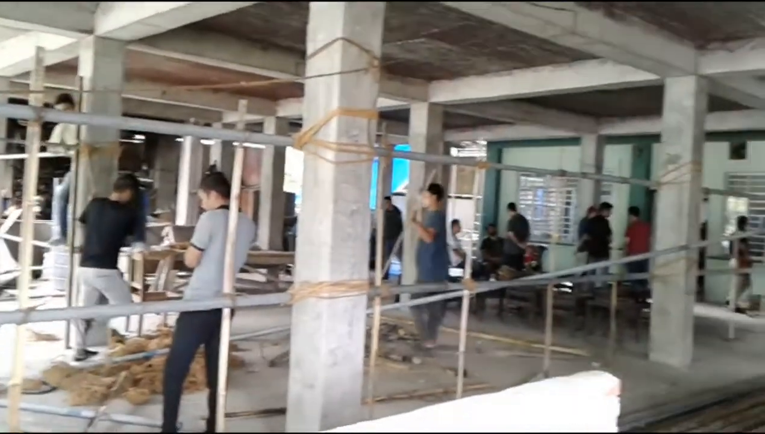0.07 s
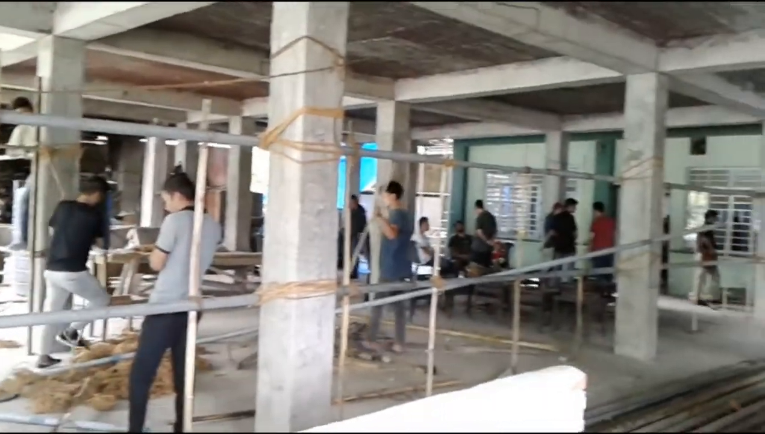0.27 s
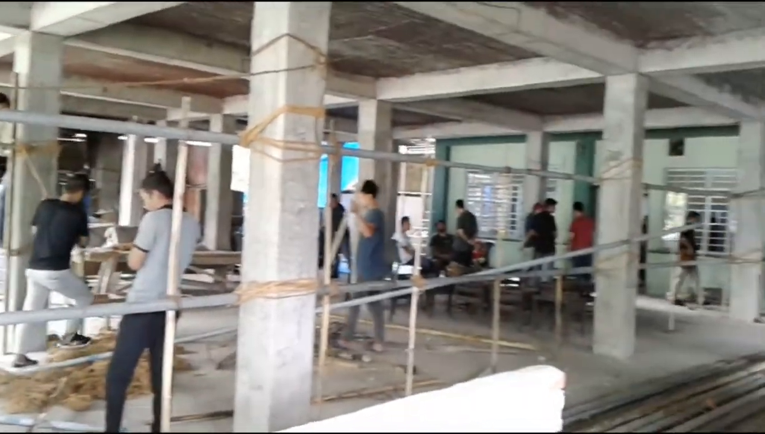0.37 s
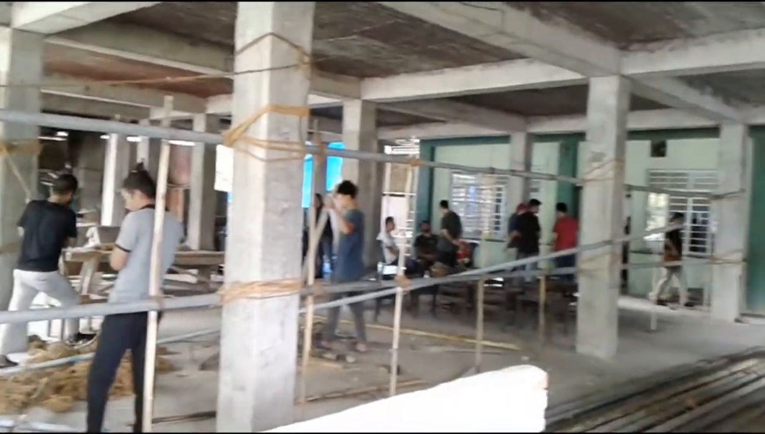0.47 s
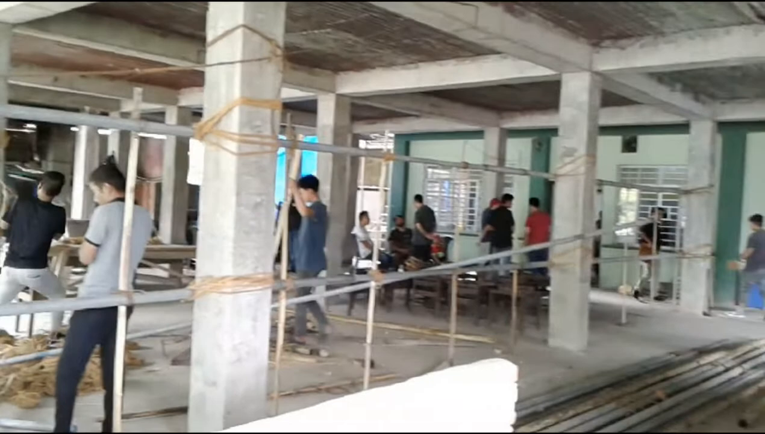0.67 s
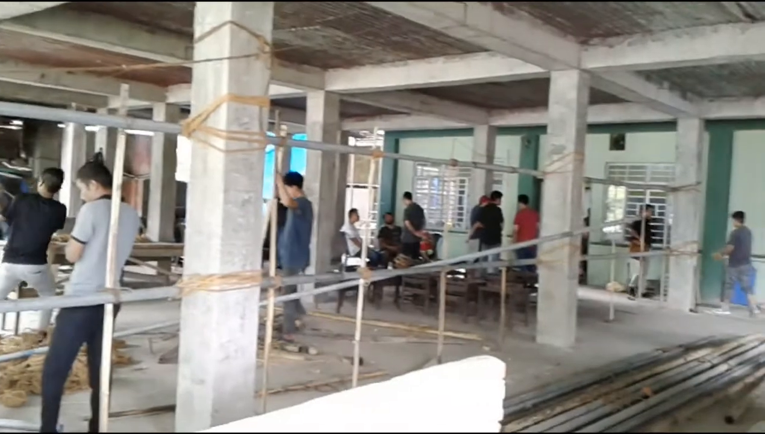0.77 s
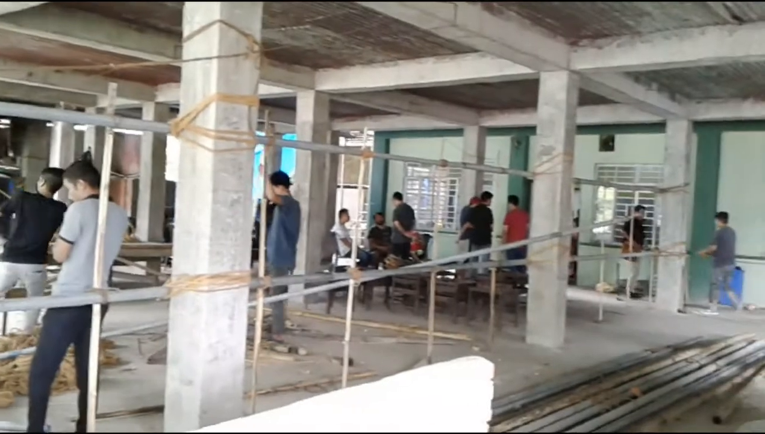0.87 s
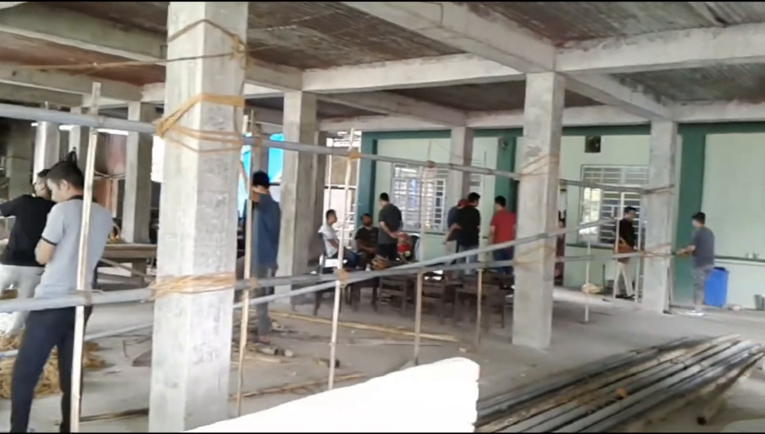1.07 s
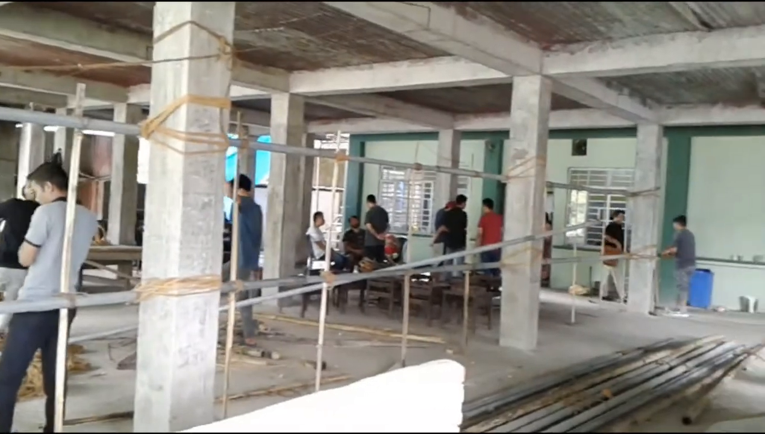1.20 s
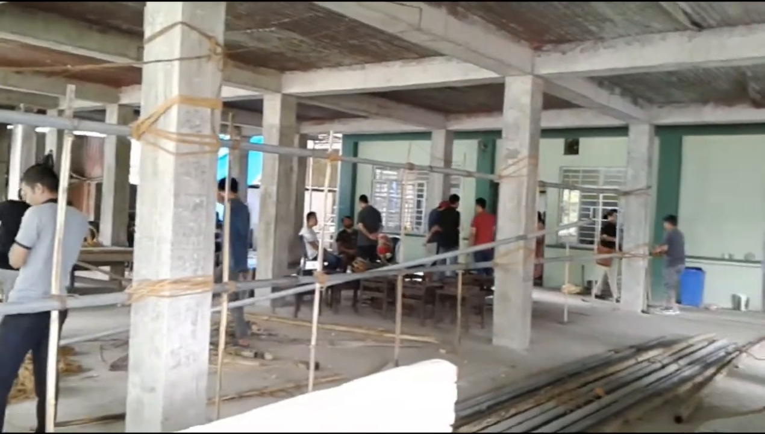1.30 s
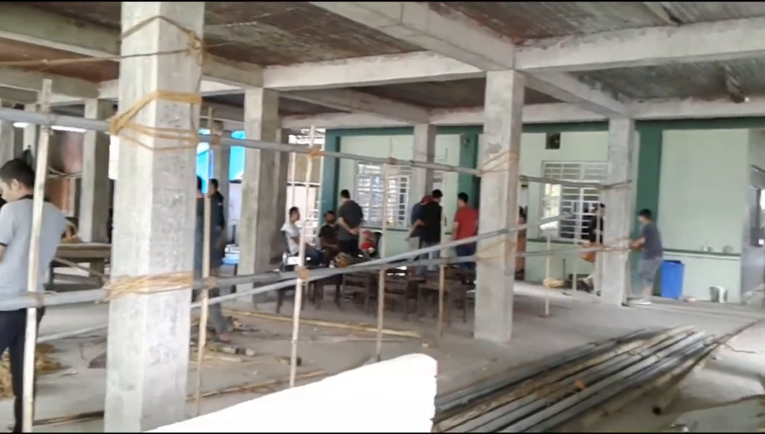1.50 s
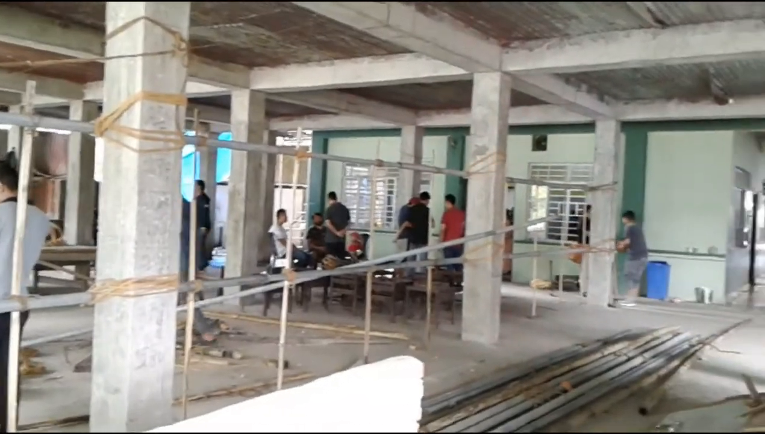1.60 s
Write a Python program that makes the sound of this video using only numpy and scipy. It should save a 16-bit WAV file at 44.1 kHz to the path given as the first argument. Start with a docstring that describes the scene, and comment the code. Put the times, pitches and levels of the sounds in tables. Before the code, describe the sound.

A load of metal pipes slides with a rattling scrape, then clanks down on concrete.

```python
"""A building site, under an open concrete roof: a load of metal building material is shifted.
It knocks and thumps as its modes are struck, then slides, many tiny slips making a rattling scrape.
As it slows, friction locks into a two-note groan, and the load lands with a double clank.
Soft low bumps and one light, distant tap follow, over site air and a faint whine.
The bare concrete answers with a short echo."""
import sys
import numpy as np
from scipy import signal
from scipy.fft import rfft, irfft
from scipy.io import wavfile

SR = 44100
rng = np.random.default_rng(int(sys.argv[2]) if len(sys.argv) > 2 else 0)


def to_wav(s):
    """Save 16-bit WAV."""
    ch = np.atleast_2d(s).T  # columns
    pcm = np.round(np.clip(ch, -1, 1) * 32767)  # PCM
    wavfile.write(sys.argv[1], SR, pcm.astype(np.int16))


N = 72765
TIME = np.arange(N) / SR

# strongest modes of the metal, struck or scraped (frequency [Hz], level [dB], t60 [s])
METAL_MODES = [(463, -6, .18), (716, -11, .15), (1021, -11, .15), (1088, -9, .16), (1507, -8, .17),
               (1540, -10, .17), (1637, -5, .12), (1737, -9, .2), (1837, -9, .2), (1920, -8, .2),
               (1970, 2, .18), (2236, -6, .2), (3696, -20, .2)]


def amp(db):
    """Decibels to gain."""
    return 10 ** (np.asarray(db) / 20)


def unit(x):
    """Scales to rms 1."""
    return x / np.sqrt(np.mean(x ** 2) + 1e-20)


def fade(t, t60):
    """Falls by 60 dB in t60 seconds."""
    return np.exp(-np.log(1000) * t / np.maximum(t60, 1e-3))


def read(points, hz):
    """Reads a table on a log-frequency axis."""
    f, value = np.transpose(points)
    return np.interp(np.log(hz + 1), np.log(f + 1), value)


def envelope(points):
    """Gain curve through (time [s], level [dB]) points, silent outside them."""
    return amp(np.interp(TIME, *np.transpose(points), left=-np.inf, right=-np.inf))


def add(mix, start, sound):
    """Mixes a sound in at start seconds."""
    part = mix[round(start * SR):][:len(sound)]
    part += sound[:len(part)]


def colour(x, points, tilt_db=0):
    """Minimum-phase EQ with the given curve, tilted by tilt_db per octave from 900 to 3150 Hz."""
    hz = abs(np.fft.fftfreq(2 * N, 1 / SR))
    octaves = np.log2(np.clip(hz, 900, 3150) / 1800)
    log_gain = np.log(amp(read(points, hz) + tilt_db * octaves))
    response = np.exp(np.conj(signal.hilbert(log_gain)))[:N + 1]
    return irfft(rfft(x, 2 * N) * response)[:N]


def band(hz, width_hz):
    """A band of noise around hz, at rms 1."""
    f = np.fft.rfftfreq(N, 1 / SR)
    peak = 1 + (2 * (f - hz) / width_hz) ** 4
    return unit(irfft(rfft(rng.standard_normal(N)) / peak, N))


def random_signs():
    """White noise made of +1 and -1."""
    return rng.choice([-1., 1.], N)


def damp(x, t60s):
    """Lets each band die away at its own speed."""
    hz, t, spectrum = signal.stft(x, SR, nperseg=256)
    decay = fade(t, read(t60s, hz)[:, None])
    return signal.istft(spectrum * decay, SR, nperseg=256)[1][:N]


def through(x, response):
    """Convolves with a response scaled to unit energy."""
    return signal.fftconvolve(x, response / np.linalg.norm(response))[:N]


def ring(modes, pitch=1, contact_hz=4500):
    """Struck modes as dying sines; the soft contact cuts the highest treble."""
    sines = sum(amp(db) * fade(TIME, t60) * np.sin(2 * np.pi * hz * pitch * TIME)
                for hz, db, t60 in modes)
    return signal.sosfilt(signal.butter(4, contact_hz, fs=SR, output="sos"), sines)


def concrete_echo(x, build_s=.0083):
    """Diffuse reflections from slab and columns."""
    # reverb time of the concrete bay (frequency [Hz], t60 [s])
    decay_times = [(150, .7), (600, 0.8), (2000, 0.45), (4500, 0.18), (9000, 0.37)]
    tail = damp(rng.standard_normal(N), decay_times)
    return through(x, tail * np.minimum(TIME / build_s, 1))


def background():
    """The bed: steady site air, the low rumble of the settling load and a thin whine."""
    # EQ of the site air (frequency [Hz], relative level [dB])
    air_eq = [(25, -12.5), (60, 10), (150, -3), (300, -14.5), (550, -15.5), (1000, -24.5), (2500, -33),
              (4500, -40.5), (7500, -45), (10000, -46), (15500, -48)]
    # swell of the rumble (time [s], level [dB])
    rumble_swell = [(.2, -59), (.3, -39.5), (.6, -44.5), (.74, -43), (.95, -46), (1.07, -53), (1.18, -54.5),
                    (1.38, -54.5), (1.48, -67), (1.56, -57), (1.65, -69.5)]
    # EQ of the rumble (frequency [Hz], relative level [dB])
    rumble_eq = [(25, -17), (90, 0), (240, -1), (360, -9.5), (550, -9), (1000, -21.5), (3000, -30.5),
                 (9000, -54.5)]
    # whine tones, each in a halo of hiss (frequency [Hz], tone level [dB], hiss level [dB])
    whine_tones = [(5730, -83, -93), (11600, -89, -91.5)]
    air = amp(-56.5) * unit(colour(rng.standard_normal(N), air_eq))
    rumble = envelope(rumble_swell) * unit(colour(rng.standard_normal(N), rumble_eq))
    whine = sum(amp(db) * np.sin(2 * np.pi * hz * TIME) + amp(hiss_db) * band(hz, width_hz=330)
                for hz, db, hiss_db in whine_tones)
    return air + rumble + whine


def distant_tap(start=1.258, echo_db=4.5):
    """A piece is set down further off: a tick and mostly echo."""
    # EQ of the tap (frequency [Hz], relative level [dB])
    tap_eq = [(300, -17.5), (1300, -2), (1700, 6), (2400, 5.5), (3300, -14.5), (4200, -20), (5000, -25.5),
              (6300, -23.5), (7100, -23), (9000, -37.5), (15000, -51.5)]
    tick = random_signs() * fade(TIME, t60=.029)
    echo = through(tick, rng.standard_normal(N) * fade(TIME, t60=.75))
    out = np.zeros(N)
    add(out, start, colour(tick + amp(echo_db) * echo, tap_eq))
    eq_gain = np.std(colour(rng.standard_normal(N), tap_eq))
    return amp(-45.5) * out / eq_gain


def bumps(attack_s=.0066, puff_db=-3.5):
    """Dull pushes as things settle, each a low ring with a puff of noise."""
    # soft bumps (time [s], level [dB], pitch [Hz], t60 [s])
    pushes = [(.203, -30.5, 139, 0.033), (0.257, -28, 55.3, .08), (.889, -26.5, 95.3, 0.17),
              (.972, -39.5, 264, 0.1), (.988, -37.5, 456, 0.055), (1.0, -35, 144.7, .15),
              (1.028, -35, 83, 0.12), (1.09, -38, 87.8, 0.24), (1.238, -43.5, 84.5, 0.18),
              (1.251, -38, 31.8, 0.37), (1.326, -33, 108, 0.11), (1.359, -42.5, 185.4, 0.13),
              (1.378, -46.5, 469, 0.11), (1.383, -37.5, 228, 0.079), (1.406, -36.5, 65.3, 0.093),
              (1.606, -32.5, 50, 0.067)]
    attack = np.minimum(TIME / attack_s, 1)
    out = np.zeros(N)
    for start, db, hz, t60 in pushes:
        body = np.sin(2 * np.pi * hz * TIME) + amp(puff_db) * band(hz, width_hz=.92 * hz)
        add(out, start, amp(db) * body * attack * fade(TIME, t60))
    return out


def groans(ramp_s=.018, jitter=.02, roughness=.25, echo_db=-14.5):
    """As the slide slows, friction locks on to one of two resonances and wavers there."""
    # stick-slip notes (time [s], length [s], level [dB], pitch [Hz], glide [Hz/s])
    notes = [(.395, 0.069, -22.5, 669, 1.5), (0.447, 0.079, -28, 675, -1.5), (.49, 0.087, -28.5, 709, -100),
             (.515, 0.077, -26.5, 512, -300), (.575, 0.061, -27.5, 484.7, -0.5),
             (0.577, 0.086, -30.5, 719.6, -100)]
    out = np.zeros(N)
    for start, length, db, hz, glide in notes:
        pitch = (hz + glide * TIME) * (1 + jitter * band(0, width_hz=140))
        swell = np.clip(np.minimum(TIME, length - TIME) / ramp_s, 0, 1)
        grip = 1 + roughness * band(0, width_hz=140)
        tone = np.sin(2 * np.pi * np.cumsum(pitch) / SR)
        add(out, start, amp(db) * swell * grip * tone)
    return out + amp(echo_db) * concrete_echo(out)


def scrape(layers=6, slips_per_s=1100, spread_db=3.5, modes_db=-12, echo_db=-8):
    """Many small slips rattle the metal while it slides."""
    # force of the slide (time [s], level [dB])
    slide_force = [(.23, -35.5), (.28, -28), (.31, -25), (.39, -24), (.45, -27.5), (.54, -34), (.61, -43),
                   (.67, -58), (.75, -63)]
    # EQ of the rattle (frequency [Hz], relative level [dB])
    rattle_eq = [(50, -25.5), (150, -0.5), (260, 5.5), (380, -3), (620, 4), (860, -3), (1080, -0.5),
                 (1850, 0.5), (2500, -4.5), (3200, -11.5), (4300, -14.5), (6000, -31), (8200, -42),
                 (9500, -62.5), (15000, -70)]
    force = envelope(slide_force) / np.sqrt(layers)
    out = np.zeros(N)
    for _ in range(layers):
        clicks = (rng.random(N) < slips_per_s / layers / SR) * random_signs()
        accents = amp(spread_db * np.minimum(rng.exponential(1, N), 2))
        slips = force * unit(clicks * accents)
        rattle = colour(random_signs() * fade(TIME, t60=.057), rattle_eq)
        out += through(slips, rattle) + amp(modes_db) * through(slips, ring(METAL_MODES))
    return out + amp(echo_db) * concrete_echo(out)


def thumps(attack_s=.005, echo_db=-16.5):
    """The weight of the load sets its low modes booming."""
    # heavy hits (time [s], relative level [dB], pitch [ratio])
    hits = [(0.2237, -24.5, 1.02), (0.2561, -10.5, 0.99), (0.2671, -12, 1.02), (0.303, -14.5, 0.99),
            (0.781, -23.5, 1), (0.8103, -14.5, .97), (0.8223, -20.5, 1), (0.865, -23, 0.91)]
    # low modes of the load (frequency [Hz], relative level [dB], t60 [s])
    load_modes = [(90, -27.5, .12), (156.6, -1, .13), (175.6, 2, 0.088), (228.1, 2, 0.17),
                  (274.2, -3.5, 0.11), (348.6, -14, 0.22)]
    attack = np.minimum(TIME / attack_s, 1)
    out = np.zeros(N)
    for start, db, pitch in hits:
        add(out, start, amp(db) * attack * ring(load_modes, pitch) / 2)
    return out + amp(echo_db) * concrete_echo(out)


def knocks(crack_db=-2):
    """The metal is struck: each knock is a short crack, a dense clang and a few stronger modes."""
    # hits (time [s], relative level [dB], treble tilt [dB/octave], mode ring [dB], echo send [dB])
    hits = [(0.2268, -39, -1, -12.5, -19.5), (0.2313, -22.5, 1.5, -11, -13.5), (0.288, -22, -1, -10.5, -2),
            (.293, -21, 0, -10, -16), (0.3716, -21, 4, -6, -6), (0.7794, -32, -3.5, -21, -4),
            (0.7856, -19.5, 3.5, -22.5, -17), (.833, -26.5, 1, -13, -23),
            (0.8388, -16.5, -2.5, -1.5, -27.5), (0.8517, -25, -1.5, -5.5, -26.5)]
    # EQ of the clang (frequency [Hz], relative level [dB])
    clang_eq = [(100, -11.5), (450, 1.5), (850, -8.5), (1100, -2), (1600, -1), (2250, -2), (3100, -19.5),
                (4300, -25), (5300, -41), (8000, -51.5), (9500, -61), (15000, -74)]
    # ring time of the dense overtones (frequency [Hz], t60 [s])
    clang_decay = [(300, 0.24), (2000, 0.19), (4000, 0.29), (9000, 0.49)]
    crack = 1 + amp(crack_db) * fade(TIME, t60=.035)
    direct, send = np.zeros((2, N))
    for start, db, tilt_db, ring_db, echo_db in hits:
        noise = random_signs()
        eq_gain = np.std(colour(noise, clang_eq, tilt_db))
        clang = colour(damp(noise, clang_decay) * crack, clang_eq, tilt_db) / eq_gain
        knock = amp(db) * (clang + amp(ring_db) * ring(METAL_MODES)) / 2
        add(direct, start, knock)
        add(send, start, amp(echo_db) * knock)
    return direct + concrete_echo(send)


def scene():
    """All sources mixed to mono."""
    return (knocks() + thumps() + bumps() + scrape() + groans() + distant_tap() + background())[None]


def record(dry):
    """A steep low-pass trims the very top of the treble."""
    lowpass = signal.firwin(511, 15750, window=("kaiser", 9), fs=SR)
    return signal.oaconvolve(dry, lowpass[None], "same")


dry = scene()
out = record(dry)
to_wav(out)
```